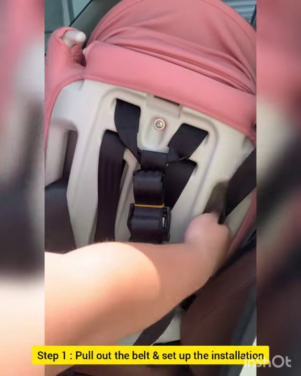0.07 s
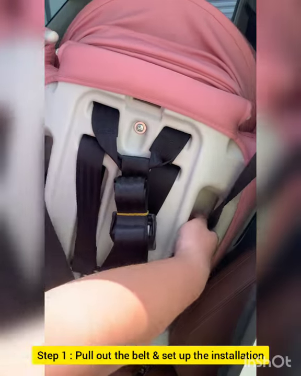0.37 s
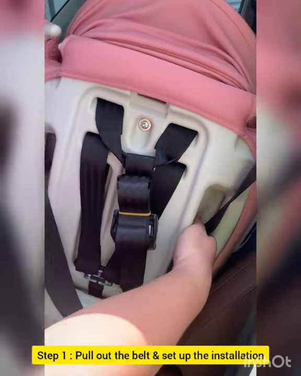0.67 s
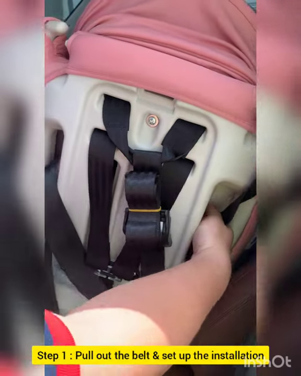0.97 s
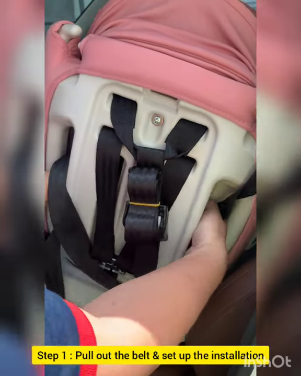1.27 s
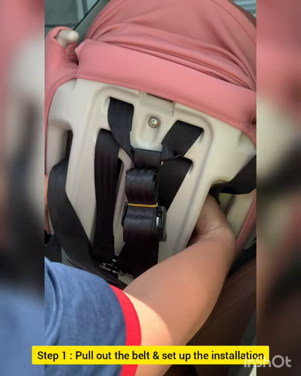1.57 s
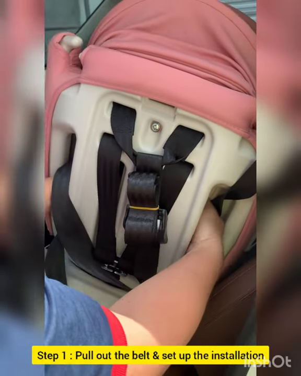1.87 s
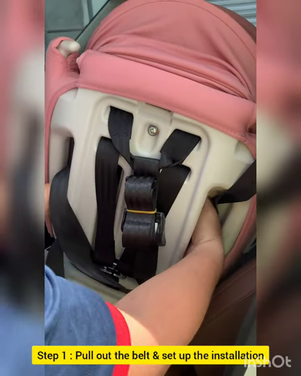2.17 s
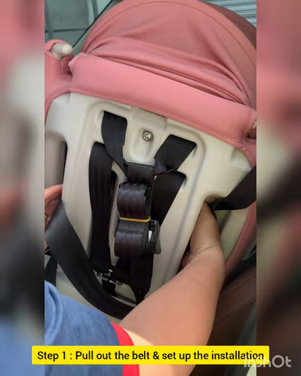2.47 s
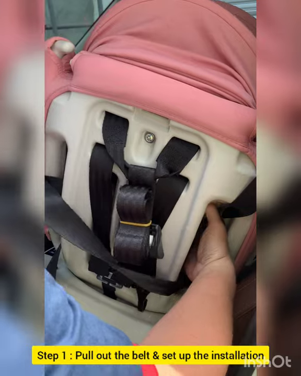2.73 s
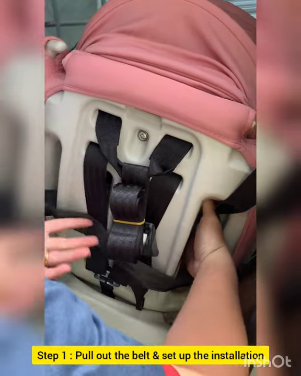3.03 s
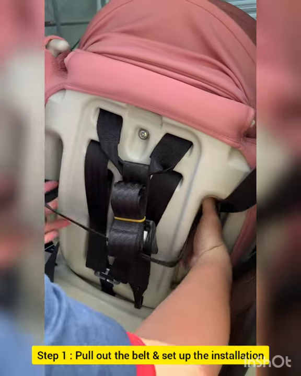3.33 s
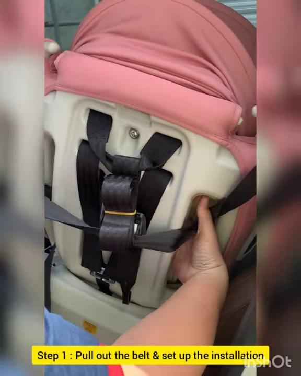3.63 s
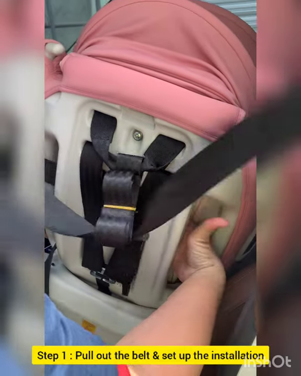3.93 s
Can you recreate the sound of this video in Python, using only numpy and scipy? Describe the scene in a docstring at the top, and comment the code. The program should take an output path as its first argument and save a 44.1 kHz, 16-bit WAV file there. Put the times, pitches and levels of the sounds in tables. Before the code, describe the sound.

Seat belt webbing hisses and rasps in short pulls as it is threaded through a child seat. The hollow plastic shell knocks and clicks now and then, heard close inside a car over a low rumble.

```python
"""Seat belt webbing hisses, rasps and creaks as a hand threads it in short pulls through a child seat.
Its weave snags on the hollow plastic shell, which rings when knocked; now and then the metal tongue
clinks or the seat rocks with a thump. Heard from inside the car on two closely spaced microphones,
over the cabin's low rumble and soft hum."""
import sys
import numpy as np
from scipy import signal
from scipy.fft import rfft, irfft, next_fast_len
from scipy.io import wavfile
from scipy.ndimage import uniform_filter1d, map_coordinates

SR = 44100
rng = np.random.default_rng(int(sys.argv[2]) if len(sys.argv) > 2 else 0)


def to_wav(sig):
    """Store sig (one row per channel, or 1-D mono) as 16-bit WAV at the path in sys.argv[1].

    Samples outside -1..1 are clipped; the rate is SR.
    """
    pcm = np.clip(np.atleast_2d(sig), -1, 1) * 32767
    pcm = np.round(pcm).astype(np.int16)
    wavfile.write(sys.argv[1], SR, pcm.T)  # frames by channels


N = 176400
T = np.arange(N) / SR
HIT_T = T[:SR // 6]  # seconds into one short sound


# Fibres sliding. Each row: frequency in Hz, relative noise density in dB.
HISS_SPECTRUM = [(1500, -0.5), (3000, 2.5), (5500, 5), (8500, -0.5), (10500, 0.5), (15500, -3.5)]
# The weave on the shell's edge. Each row: frequency in Hz, relative noise density in dB.
RASP_SPECTRUM = [(250, -15.5), (570, -0.5), (740, -14), (1000, 2), (1750, -0.5), (2200, 1.5), (2800, -7),
                 (4000, -9.5), (14000, -54)]
# The hiss dulls and brightens. Each row: time in seconds, gain of its top treble in dB.
HISS_TREBLE = [(1.45, -1.5), (2.65, -1), (3.4, 4), (3.95, 0.5)]

def webbing(jerks_per_s=17.4, hiss_jerk_db=3, rasp_jerk_db=1, treble_hz=11000):
    """With each pull the fibres hiss, and the weave snags jerkily on the shell and stirs its modes."""
    hiss_power, rasp_power = pull_power()
    jerk = drift(jerks_per_s)
    fibres = grains(per_s=14000, spread_db=2) * amp(hiss_jerk_db * jerk)
    fibres = unit(colour(fibres, HISS_SPECTRUM))
    treble = signal.sosfilt(signal.butter(2, treble_hz, "high", fs=SR, output="sos"), fibres)
    treble = signal.sosfilt(signal.butter(2, treble_hz, "high", fs=SR, output="sos"), treble[::-1])[::-1]
    treble_gain = amp(np.interp(T, *np.transpose(HISS_TREBLE)))
    hiss = flutter(fibres + (treble_gain - 1) * treble)
    snags = grains(per_s=900, spread_db=2.8) * amp(rasp_jerk_db * jerk)
    snags = unit(colour(snags, RASP_SPECTRUM))
    ring = unit(signal.fftconvolve(snags, shell())[:N])
    return np.sqrt(hiss_power) * hiss + np.sqrt(rasp_power) * flutter(snags + ring)


# Pulls on the belt. Each row: start, fastest moment and end in seconds, hiss and rasp levels in dB.
BELT_PULLS = [(0, 0.194, 0.27, -73, -58), (0.19, 0.261, 0.33, -60.5, -51.5), (.26, 0.358, 1.9, -66, -54.5),
              (0.608, 0.754, 0.95, -52.5, -50.5), (0.858, 0.955, 1.014, -42, -39),
              (0.95, 0.986, 1.1, -49.5, -47.5), (1.035, 1.178, 1.33, -55.5, -55.5),
              (1.266, 1.365, 1.51, -63.5, -50.5), (1.356, 1.458, 1.676, -49.5, -47),
              (2.048, 2.15, 2.214, -57.5, -53.5), (2.25, 2.33, 2.556, -58, -56),
              (2.363, 2.68, 3.24, -58.5, -54.5), (2.607, 2.621, 2.763, -50, -39.5),
              (2.756, 2.862, 3.05, -53.5, -61), (2.994, 3.035, 3.26, -59, -58),
              (3.177, 3.24, 3.45, -54.5, -56), (3.3, 3.405, 3.592, -52.5, -50),
              (3.505, 3.526, 3.65, -51, -43), (3.638, 3.71, 3.75, -51.5, -45),
              (3.698, 3.767, 4, -52.5, -50), (3.895, 3.939, 4.24, -50, -51)]

def pull_power():
    """The power of hiss and rasp swells and fades with the speed of each pull."""
    power = np.zeros((2, N))
    for start, fastest, end, hiss_db, rasp_db in BELT_PULLS:
        now = slice(*np.searchsorted(T, [start, end]))
        speed = np.sin(np.interp(T[now], [start, fastest, end], [0, np.pi / 2, 0])) ** 2.2
        power[:, now] += (amp([[hiss_db], [rasp_db]]) * speed) ** 2
    return power


def flutter(x, depth_db=3, per_s=22, per_octave=3):
    """The contact patch keeps shifting, so each region of pitch swells and sinks by chance."""
    f, t, spectra = signal.stft(x, SR, nperseg=512)
    octaves = np.log2(np.maximum(f / f[1], 1))
    grid = np.meshgrid(per_octave * octaves, per_s * t, indexing="ij")
    chance = rng.standard_normal([int(axis.max()) + 2 for axis in grid])
    gain = amp(depth_db * map_coordinates(chance, grid, order=1))
    return unit(signal.istft(spectra * gain)[1][:N])


# Taut webbing in the slot. Each row: start and length in seconds, level in dB, slips per second,
# upper band edge in Hz.
SLOT_CREAKS = [(.873, 0.02, -38, 430, 2280), (.903, 0.02, -36.5, 320, 2750), (2.732, 0.018, -39, 445, 2140),
               (3.699, 0.021, -38, 610, 3820), (3.882, 0.02, -34.5, 192, 1920)]

def creaks(jitter=0.12, low_hz=900):
    """The webbing sticks and slips in a short, nearly regular run that rings the shell."""
    out = np.zeros(N)
    for start, length, db, rate, high_hz in SLOT_CREAKS:
        cycles = np.cumsum(rate * (1 + jitter * drift(rate)[:len(HIT_T)])) / SR
        fade = np.sqrt(np.clip(1 - HIT_T / length, 0, 1))
        slips = np.diff(np.floor(cycles), prepend=-1) * fade
        ring = signal.fftconvolve(slips, shell())[:len(HIT_T)]
        band = signal.butter(3, [low_hz, high_hz], "band", fs=SR, output="sos")
        creak = signal.sosfilt(band, unit_hit(slips) + unit_hit(ring) / 2)
        add(out, start, amp(db) * unit_hit(creak))
    return out


# Knocks on the child seat. Each row: start in seconds, relative levels of hollow body, clack and snap
# in dB, pitch favoured by the struck spot in Hz.
SHELL_KNOCKS = [(0.361, -59, -43, -54.5, 3160), (.496, -39.5, -48, -72, 545),
                (.607, -38.5, -39.5, -59.5, 850), (.637, -44, -37.5, -61, 1090),
                (.799, -39.5, -38, -68, 1090), (1.19, -37.5, -36, -45.5, 726),
                (1.287, -35, -29, -50.5, 650), (1.335, -36, -37, -53, 640), (1.371, -40.5, -49, -71, 640),
                (2.581, -50, -41, -68, 600), (2.624, -31.5, -24, -30.5, 1780),
                (2.6287, -28, -25.5, -55, 410), (2.6365, -31, -33, -40.5, 855),
                (2.655, -33.5, -35, -50, 760), (2.966, -27, -26.5, -39.5, 1090),
                (3.077, -36, -44, -61, 550), (3.115, -74, -49, -56.5, 580),
                (3.336, -33.5, -38.5, -35.5, 497), (3.58, -35.5, -51, -70, 560),
                (3.641, -44, -43, -78, 1460), (3.802, -38, -36, -66, 1530)]
# The shell's crowded modes. Each row: frequency in Hz, relative noise density in dB.
CROWD_SPECTRUM = [(150, 4), (330, 3), (750, 6), (1300, -3.5), (1800, -3), (2600, -11.5), (5000, -13.5),
                  (9000, -68)]
# The snap of contact. Each row: frequency in Hz, relative noise density in dB.
SNAP_SPECTRUM = [(1500, -11.5), (3500, 1), (6500, 1), (8400, 3.5), (11000, -2.5), (15500, -11)]

def knocks(body_hz=606, clack_hz=1650, build_s=0.0006, snap_s=0.0014):
    """A hard contact snaps and sets the hollow shell ringing."""
    out = np.zeros(N)
    build = 1 - np.exp(-HIT_T / build_s)
    snap_fade = np.exp(-HIT_T / snap_s) + amp(-16.5) * decay(t60_s=0.12)
    for start, body_db, clack_db, snap_db, spot_hz in SHELL_KNOCKS:
        crowd_noise, snap_noise = rng.standard_normal((2, len(HIT_T)))
        crowd = colour(crowd_noise * decay(t60_s=0.08) * build, CROWD_SPECTRUM)
        body = unit_hit(unit_hit(shell(spot_hz) * build) + amp(-3.5) * unit_hit(crowd))
        add(out, start, amp(1) * colour(body, [(body_hz, body_db), (clack_hz, clack_db)]))
        snap = colour(snap_noise * snap_fade, SNAP_SPECTRUM)
        add(out, start, amp(snap_db - 1) * unit_hit(snap))
    return out


# Modes of the plastic shell. Each row: frequency in Hz, relative level in dB.
SHELL_MODES = [(368, -4.5), (530, -6), (640, 0.5), (765, -1), (850, -2), (1090, -4.5), (1165, -12.5),
               (1505, -3), (1705, -5), (1970, -6.5), (2190, -4.5), (3200, -7)]

def shell(spot_hz=None, favour_db=8.5, favour_octaves=0.15, grip_detune=0.008):
    """The shell rings; a struck spot favours modes near one pitch, and the grip shifts them a little."""
    hz, db = np.transpose(SHELL_MODES)
    if spot_hz:
        db = db + favour_db * np.exp(-(np.log2(hz / spot_hz) / favour_octaves) ** 2)
    hz = hz * (1 + grip_detune * rng.standard_normal(len(hz)))
    return ringing(hz, db, t60_s=0.051 * (1000 / hz) ** 0.76)  # high modes die sooner


# Clinks of the belt's tongue. Each row: start in seconds, level in dB, strongest mode in Hz.
TONGUE_CLINKS = [(0.34, -54.5, 3200), (1.288, -58.5, 6645), (1.336, -68, 7190)]
# The tongue's modes. Each entry: frequency in Hz.
TONGUE_MODES = [3200, 6645, 7190]

def tongue(other_modes_db=-19):
    """The metal tongue rings briefly when the belt jolts it, mostly in one mode."""
    out, hz = np.zeros(N), np.array(TONGUE_MODES)
    for start, db, main_hz in TONGUE_CLINKS:
        levels = np.where(hz == main_hz, 0, other_modes_db)
        add(out, start, amp(db) * unit_hit(ringing(hz, levels, t60_s=[0.18])))
    return out


# Low thumps under the child seat. Each row: start in seconds, level in dB, frequency in Hz.
SEAT_THUMPS = [(2.206, -37, 72.6), (3.538, -26.5, 64)]

def thumps(rise_s=0.013):
    """The seat rocks on its cushion for a few slow cycles."""
    out, age = np.zeros(N), HIT_T / rise_s
    swell = (age * np.exp(1 - age)) ** 2
    for start, db, hz in SEAT_THUMPS:
        add(out, start, amp(db) * swell * np.sin(2 * np.pi * hz * HIT_T))
    return out


# Room tone inside the car. Each row: frequency in Hz, relative noise density in dB.
CABIN_SPECTRUM = [(28, -36.5), (45, -3.5), (100, 0.5), (165, -2.5), (280, -11.5), (400, -18), (1000, -25),
                  (1600, -29.5), (3200, -41), (6000, -53), (15000, -62.5)]

def cabin(hum_hz=146.05, hum_width_hz=6.5):
    """A steady low rumble and a wavering hum fill the cabin."""
    phase = 2 * np.pi * hum_hz * T
    hum = unit(drift(hum_width_hz) * np.cos(phase) + drift(hum_width_hz) * np.sin(phase))
    rumble = unit(colour(rng.standard_normal(N), CABIN_SPECTRUM))
    return amp(-40.5) * rumble + amp(-47.5) * hum


# Arrival at the microphone pair. Each row: frequency in Hz, phase lead of the left side in radians.
LEFT_LEAD = [(0, -0.3), (800, 1.51), (1300, 0.53), (2700, 1.5), (3800, 1.71), (4700, 3), (16000, 20.5)]
# Balance across the pair. Each row: frequency in Hz, left minus right in dB.
LEFT_BALANCE = [(45, 0.5), (350, -6), (700, -4), (1300, -1), (4400, -0.15)]
# Reflections from all round the cabin. Each row: frequency in Hz, level against the direct sound in dB.
REFLECTIONS = [(150, -30), (500, -14), (1500, -17)]

def microphones(x):
    """Sound reaches the left of the close pair first; short cabin reflections differ on each side."""
    n = next_fast_len(N + SR // 4, real=True)
    f, spectrum = np.fft.rfftfreq(n, 1 / SR), rfft(x, n)
    lead = np.interp(f, *np.transpose(LEFT_LEAD))
    diffuse = amp(at_hz(REFLECTIONS, f))
    channels = []
    for side in (1, -1):  # left, right
        echoes = rng.standard_normal(len(HIT_T)) * decay(t60_s=0.034)
        path = np.exp(0.5j * side * lead) + diffuse * rfft(echoes / np.linalg.norm(echoes), n)
        balance = amp(side * at_hz(LEFT_BALANCE, f) / 2)
        channels.append(irfft(spectrum * path * balance, n)[:N])
    return np.array(channels)


def amp(db):
    """Decibels to gain."""
    return 10 ** (np.asarray(db) / 20)


def decay(t60_s):
    """A fade that falls 60 dB in t60_s."""
    return amp(-60 * HIT_T / t60_s)


def unit(x):
    """Scale to rms 1."""
    return x / np.sqrt(np.mean(x ** 2) + 1e-20)


def unit_hit(x):
    """Scale so that the loudest 7 ms have rms 1."""
    return x / np.sqrt(uniform_filter1d(x ** 2, size=300, mode="constant").max() + 1e-20)


def at_hz(points, hz):
    """Read a table on a log-frequency axis."""
    f, values = np.transpose(points)
    return np.interp(np.log(np.maximum(hz, 1)), np.log(f), values)


def colour(x, points):
    """Causal (minimum-phase) filter following a table of (Hz, dB)."""
    n = 2 * next_fast_len(len(x) // 2 + 1024, real=True)
    gain = amp(at_hz(points, np.fft.rfftfreq(n, 1 / SR)))
    cepstrum = irfft(np.log(gain))
    cepstrum[1:n // 2] *= 2
    cepstrum[n // 2 + 1:] = 0
    return irfft(rfft(x, n) * np.exp(rfft(cepstrum)))[:len(x)]


def drift(rate_hz):
    """Random wander with rms 1, mostly slower than rate_hz."""
    f = np.fft.rfftfreq(N, 1 / SR)
    return unit(irfft(rfft(rng.standard_normal(N)) / (1 + (f / rate_hz) ** 2), N))


def grains(per_s, spread_db):
    """Random tiny clicks of uneven size, rms 1."""
    sizes = amp(spread_db * np.minimum(rng.exponential(1, N), 5)) * rng.choice([-1, 1], N)
    return unit(sizes * (rng.random(N) < per_s / SR))


def ringing(hz, db, t60_s):
    """Decaying sines, each starting in a phase of its own."""
    phase = rng.uniform(0, 2 * np.pi, (len(hz), 1))
    sines = np.sin(2 * np.pi * np.c_[hz] * HIT_T + phase)
    return np.sum(amp(np.c_[db]) * decay(np.c_[t60_s]) * sines, axis=0)


def add(out, start_s, x):
    """Mix x in at start_s."""
    i = int(np.clip(start_s * SR, 0, N - 1))
    out[i:i + len(x)] += x[:N - i]


def scene():
    """Belt, seat and cabin at the pair; some rustle, clatter and rumble scatter in from the sides."""
    direct = microphones(webbing() + knocks() + creaks() + tongue() + thumps() + cabin())
    scattered = amp(-11) * (webbing() + knocks() + cabin() / 2)
    return direct + scattered * [[1], [-1]]  # opposite polarity left and right


def record(dry, cutoff_hz=16100):
    """A steep low-pass cuts the highest treble."""
    return signal.sosfilt(signal.ellip(10, 0.1, 80, cutoff_hz, fs=SR, output="sos"), dry)


dry = scene()
out = record(dry)
to_wav(out)
```